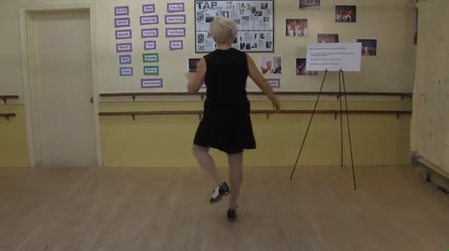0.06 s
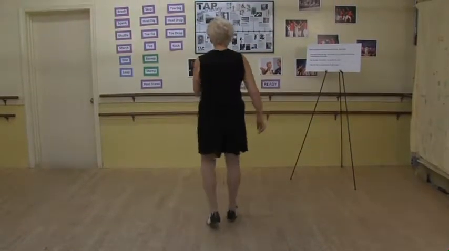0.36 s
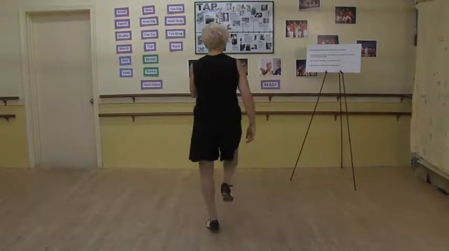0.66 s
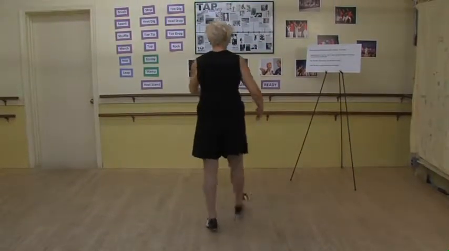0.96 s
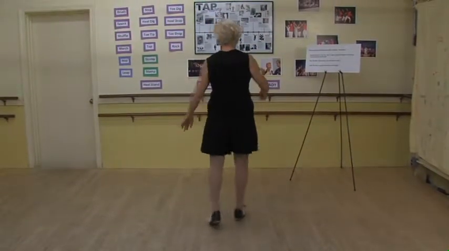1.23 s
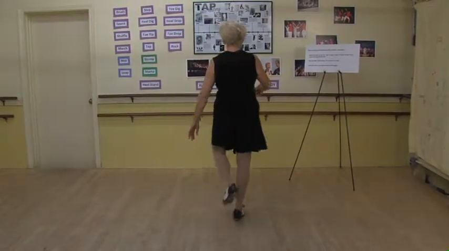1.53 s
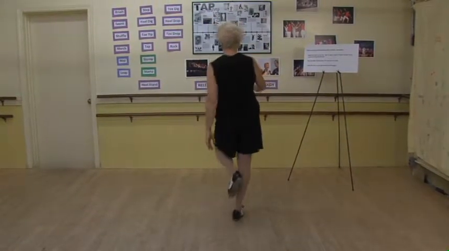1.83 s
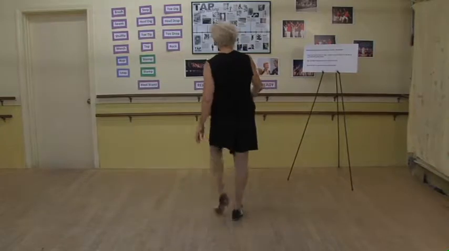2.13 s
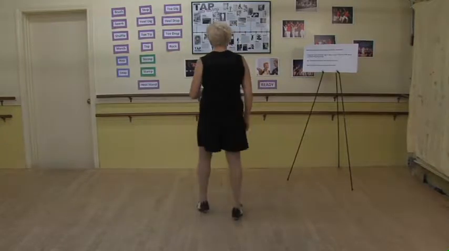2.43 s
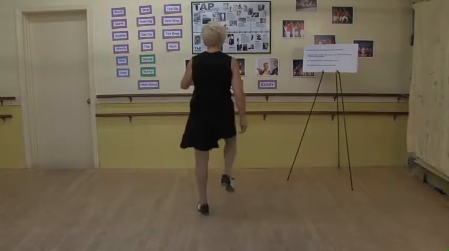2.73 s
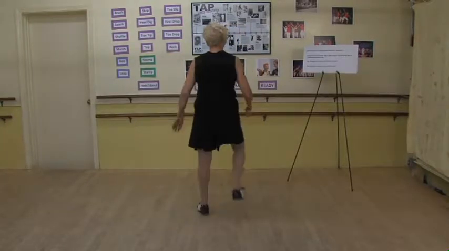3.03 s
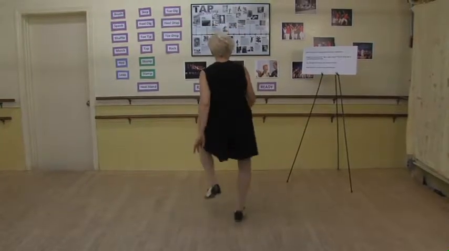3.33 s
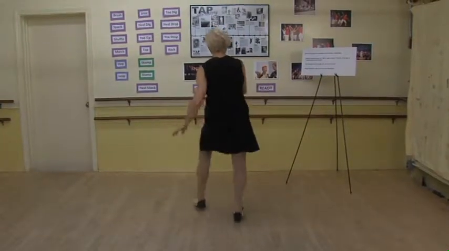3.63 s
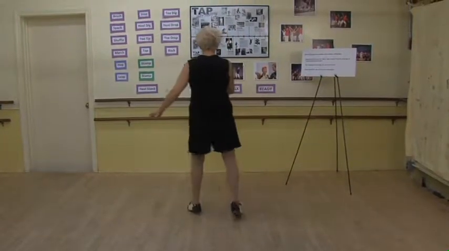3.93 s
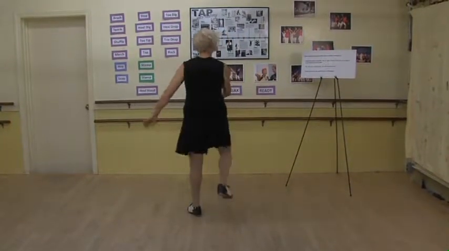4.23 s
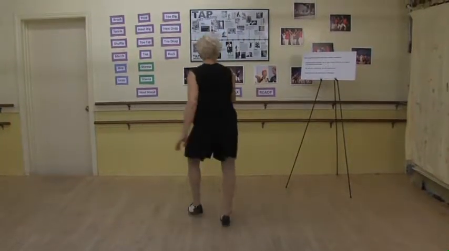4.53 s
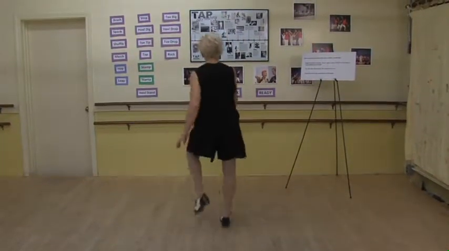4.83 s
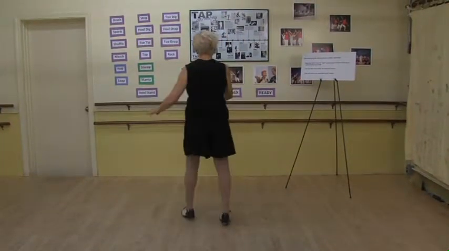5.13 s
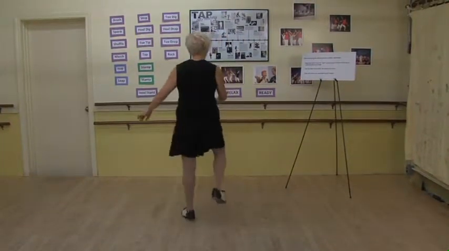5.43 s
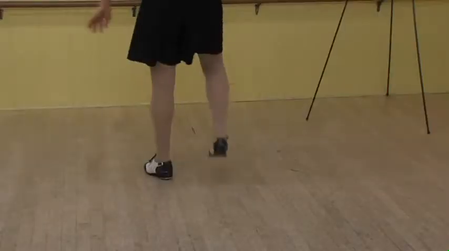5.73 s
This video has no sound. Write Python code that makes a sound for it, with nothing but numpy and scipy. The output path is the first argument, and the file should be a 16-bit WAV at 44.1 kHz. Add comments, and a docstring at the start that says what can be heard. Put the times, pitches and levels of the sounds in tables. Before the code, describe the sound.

A bare dance studio rumbles and hisses quietly as the echo of a brushed tap shoe fades. A dancer in metal-tipped shoes steps slowly on a sprung wooden floor. Each step is a sharp click and slap with a woody knock; the boards boom softly and the walls echo for under a second. Toe taps land at about 0.4 and 0.9 seconds, with a lighter one at 1.1. A pause follows, holding very faint shoe ticks and a tiny sole squeak near 1.8. Steps resume at 2.2 and 2.5, then a barely audible scuff near 3 leads into a heel at 3.2. A firm step at 3.6 is followed by a stamp at 3.9. A heel lands at 4.5, another step at 4.9 and a second stamp at 5.2; the stamps are slightly the loudest. A last flat heel strike comes at 5.8 seconds.

```python
"""A bare, echoing studio rumbles and hisses quietly while the sound of a brushed tap shoe dies away.
A dancer in metal-tipped shoes then steps slowly on the sprung wooden floor. Each step is a click and a
woody knock, then the sharp slap of the plate within a few ms; the boards boom and the walls answer.
Between steps the shifting shoes tick faintly; a sole squeaks near 1.8 s and a plate scuffs near 3 s.
Two stamps come in the second half, and a heel lands last."""
import sys
import numpy as np
from scipy import signal
from scipy.fft import rfft, irfft, next_fast_len
from scipy.io import wavfile

SR = 44100
rng = np.random.default_rng(int(sys.argv[2]) if len(sys.argv) > 2 else 0)


def inscribe(sig):
    """Save sig as 16-bit PCM at rate SR to the path in sys.argv[1].

    A 1-D sig is mono; a 2-D sig holds one channel per row.
    Samples are clipped to [-1, 1] before scaling.
    """
    pcm = np.round(np.clip(np.atleast_2d(sig).T, -1, 1) * 32767)
    wavfile.write(sys.argv[1], SR, pcm.astype(np.int16))


N = 263277
T = np.arange(SR) / SR  # one second of time for each sound
HZ = np.fft.rfftfreq(2 * SR, 1 / SR) + 1e-3  # the frequencies at which filters are drawn


def amp(db):
    """Turn decibels into a gain."""
    return 10 ** (np.asarray(db) / 20)


def norm(x):
    """Scale a sound to an energy of 1."""
    return x / np.sqrt(np.sum(x ** 2) + 1e-20)


def along(points, hz):
    """Read a curve of (frequency, value) points, with octaves evenly spaced."""
    freqs, values = np.transpose(points)
    return np.interp(np.log(hz + 1), np.log(freqs), values)


def above(corner_hz, order):
    """Gain of a filter that cuts the bass; a higher order cuts more steeply."""
    return 1 / np.sqrt(1 + (corner_hz / HZ) ** (2 * order))


def coloured(x, gain):
    """Give each frequency of x its gain, with no ringing ahead of the sound."""
    cepstrum = irfft(np.log(np.maximum(gain, 1e-6)))
    cepstrum[1:SR] *= 2
    cepstrum[SR + 1:] = 0
    return irfft(rfft(x, 2 * SR) * np.exp(rfft(cepstrum)))[:SR]


def add(track, s, x):
    """Mix x into the track at s seconds, dropping what falls outside it."""
    start = int(round(s * SR))
    x, start = x[max(-start, 0):], max(start, 0)
    part = track[start:start + len(x)]
    part += x[:len(part)]


def air():
    """The quiet room rumbles and hisses steadily."""
    # tone of the room: f/Hz, level/dB
    room_tone = [(15, -65.5), (25, -32), (59, -16.5), (104, -10.5), (140, -11), (274, -8.5), (349, -17.5),
                 (399, -17), (1410, -22.5), (4750, -38), (15500, -39.5)]
    gain = amp(along(room_tone, np.fft.rfftfreq(N, 1 / SR)))
    noise = irfft(rfft(rng.standard_normal(N)) * gain, N)
    return amp(-69.5) * np.sqrt(N) * norm(noise)


def contact(chatter, t60):
    """One hit, then the surfaces chatter briefly, fading by 60 dB in t60 seconds."""
    push = chatter * norm(rng.standard_normal(SR) * amp(-60 * T / t60))
    push[0] += 1
    return norm(push)


def knock(hz, t60, rise_s):
    """The plank under the shoe swings quickly to and fro, over the slower flex of the floor."""
    swing = 2 * np.pi * hz * rng.normal(1, 0.026) * T
    plank = (np.sin(swing) + 0.28 * np.sin(0.47 * swing)) * amp(-60 * T / t60)
    flex = 0.14 * np.sin(.19 * swing) * amp(-60 * T / 0.07)
    return norm((plank + flex) * (1 - np.exp(-T / rise_s)))


def boards():
    """The sprung floor booms; every spot rings with its own mix of the same low notes."""
    # notes of the floor: f/Hz, level/dB, fade time/s
    notes = [(72.3, -13.5, 0.98), (133.4, -3.5, 0.74), (159, -4, 0.68), (191.6, -2.5, 0.91),
             (244.4, -1.5, 0.98), (310.6, -4, 1), (404.6, -3.5, 0.82), (489, -4, 0.77)]
    ring = np.zeros(SR)
    for hz, db, t60 in notes:
        fade = amp(db + rng.normal(0, 2.9) - 60 * T / t60)
        ring += fade * np.sin(2 * np.pi * (hz * rng.normal(1, .008) * T + rng.random()))
    return norm(ring * (1 - np.exp(-T / 0.017)))


def reverb(build_s):
    """Echoes blur into a wash that builds up, then each frequency dies at its own speed."""
    # how long the studio rings: f/Hz, fade time/s
    ring_times = [(60, 0.87), (150, 0.52), (350, 1), (1000, 0.81), (2500, 0.81), (4200, 0.76), (7500, 0.62),
                  (11000, 0.5), (16000, 0.39)]
    hz, t, noise = signal.stft(rng.standard_normal(SR), SR, nperseg=256)
    fall_db = -60 * t / along(ring_times, hz)[:, None]
    # a little sound stays trapped between the bare walls and dies more slowly
    decay = np.hypot(amp(fall_db), amp(-21 + 0.89 * fall_db))
    tail = signal.istft(noise * decay, SR, nperseg=256)[1][:SR]
    return norm(tail * (1 - np.exp(-T / build_s)))


def walls(count=14):
    """Separate early echoes bounce off the walls; later ones tend to be weaker."""
    echoes = np.zeros(SR)
    for delay, size in zip(rng.uniform(.016, .085, count), rng.standard_normal(count)):
        add(echoes, delay, np.array([size * amp(-110 * delay)]))
    return norm(echoes)


def step(landing, roll, tilt_db, knock_hz, knock_db):
    """A shoe lands: the metal plate clicks and slaps, the room echoes, the wood knocks and booms."""
    # tone colour of each way of landing: f/Hz, level/dB
    toe = [(140, 1.5), (290, -6.5), (1150, -0.5), (1770, -5.5), (1900, -2), (2730, -8), (3650, -3),
           (4880, -17), (5640, -14), (7540, -18), (10070, -30), (10830, -30), (13450, -35.5), (15000, -49)]
    tip = [(140, 2), (310, -2.5), (420, -18), (690, -7.5), (1420, -11.5), (2360, -3.5), (2940, -21),
           (3160, -12), (4220, -7.5), (5240, -19), (7010, -23), (8710, -17.5), (10070, -27), (15000, -39)]
    edge = [(140, -9.5), (190, -5.5), (360, -9.5), (550, -5), (690, -8.5), (800, -2.5), (2940, -9),
            (4220, -1), (6520, -17.5), (7540, -18.5), (9370, -20.5), (12510, -32), (13450, -29),
            (15000, -48)]
    heel = [(140, 3), (360, -6.5), (690, -5.5), (1420, -1), (1900, -11), (2200, -7.5), (2730, -14.5),
            (3930, -3), (6520, -22.5), (7540, -19.5), (9370, -22), (12510, -37), (14470, -36.5),
            (15000, -48.5)]
    ball = [(140, -6.5), (450, 0), (690, -6.5), (860, -6), (1320, -7.5), (2040, -7.5), (3400, -14),
            (4880, -24), (7010, -28), (10070, -44.5), (10830, -39.5), (12510, -49.5), (13450, -47),
            (15000, -58.5)]
    stamp = [(140, -1.5), (330, 0), (450, 1), (1150, -1), (1530, -5.5), (1900, -5.5), (2360, -1.7),
             (3930, -5), (5640, -5.5), (7540, -16), (9370, -14.5), (12510, -25), (13450, -25.5),
             (15000, -33)]
    brush = [(140, -6.5), (700, 0.5), (2400, -7), (3800, -12.5), (5800, 0.5), (7500, -19), (15000, -24)]
    # each way of landing: tone colour, bass from the dancer's weight/dB, boom/dB, slap delay/s
    spectrum, weight_db, boom_db, slap_s = {
        "toe": (toe, 1.5, -24.5, .0029),
        "tip": (tip, 5, -25, .00055),
        "edge": (edge, 5.8, -25, .0043),
        "heel": (heel, -1.3, -24, .0028),
        "ball": (ball, 6.7, -22.5, .0035),
        "stamp": (stamp, 2.9, -25, .0044),
        "brush": (brush, -.5, -21.5, .0026),
    }[landing]
    # A flat shoe (roll 0) lands in one slap; one that rolls down (roll 1) clicks first,
    # slaps less and throws more sound at the ceiling.
    click_db = np.interp(roll, (0, 1), (-15.5, -3.5))
    slap_db = np.interp(roll, (0, 1), (-1.6, -5.5))
    ceiling_db = np.interp(roll, (0, 1), (-18, 0))
    near = amp(click_db) * contact(chatter=2.5, t60=0.015)
    add(near, slap_s, amp(slap_db) * contact(chatter=1, t60=.0065))
    add(near, .0135, amp(ceiling_db) * contact(chatter=4.3, t60=0.036))
    near += amp(-17.5) * walls()
    # bass and top treble spread sideways, so they arrive mostly with the room
    beam = above(440, order=1) / np.sqrt(1 + (HZ / 7000) ** 2)
    blow = coloured(near, beam) + reverb(build_s=.0035)
    bright_db = tilt_db * np.log2(np.clip(HZ, 300, None) / 1500)
    bass_db = weight_db / (1 + (HZ / 210) ** 4)
    colour = amp(along(spectrum, HZ) + bright_db + bass_db)
    colour *= above(130, order=5) + amp(-19) * above(46, order=1)
    colour /= np.sqrt(np.mean(colour ** 2))
    boom = amp(boom_db) * np.interp(200, HZ, colour) * boards()
    wood = amp(knock_db) * knock(knock_hz, t60=0.031, rise_s=0.00095)
    return norm(coloured(blow, colour) + wood + boom)


def steps():
    """The slow dance; a level is the step's energy spread over a tenth of a second."""
    # footfalls: t/s, landing, level/dB, roll 0-1, brightness/(dB per octave), knock f/Hz, knock level/dB
    footfalls = [ (-.16, "brush", -38.5, 0.4, .5, 900, -12.5), (.42, "toe", -27.5, 0.3, 0.6, 1080, -20.5),
                 (.9, "toe", -26.5, 0.83, 0, 1130, -9.5), (1.1333, "tip", -30.5, 0.6, 1.8, 261, -15),
                 (2.2001, "ball", -25.5, 0.57, 1.62, 1000, -4.5), (2.457, "edge", -28, .55, 0, 820, -16),
                 (3.188, "heel", -29.5, 0.33, 0.87, 1226, -5.5), (3.642, "ball", -25, 0.35, 1.5, 830, -6),
                 (3.8545, "stamp", -24, 0.89, .7, 650, -12), (4.4962, "heel", -27, 0.37, -0.02, 1052, -5),
                 (4.9333, "ball", -27.5, .75, 0.93, 826, -14), (5.1552, "stamp", -24, 0.94, 0.62, 760, -20),
                 (5.802, "heel", -26.6, 0, 0.44, 1230, -3.5), ]
    out = np.zeros(N)
    for s, landing, db, *how in footfalls:
        add(out, s, amp(db) * np.sqrt(SR / 10) * step(landing, *how))
    return out


def touches(skip_s=0.04, skip_loss_db=1.2, width_octaves=0.84):
    """Shoes tick and bump as the weight shifts; in a scuff the plate skips, weaker each time."""
    # light touches of a shoe: t/s, level/dB, f/Hz
    ticks = [(0.307, -69.5, 220), (.325, -69, 450), (1.731, -75, 400), (1.975, -77, 600),
             (2.804, -77.5, 10410), (2.937, -77.5, 5940), (4.403, -70, 3010)]
    scuff_s, scuff_db, scuff_hz = 3.056, -68, 3040
    skips = [(scuff_s + k * skip_s, scuff_db - k * skip_loss_db, scuff_hz) for k in range(3)]
    out = np.zeros(N)
    for s, db, hz in ticks + skips:
        band = np.exp(-(np.log2(HZ / hz) / width_octaves) ** 2 / 2) + amp(-49)
        rub = norm(rng.standard_normal(SR) * T * amp(-60 * T / .04))
        touch = coloured(rub + 1.1 * reverb(build_s=.012), band)
        add(out, s, amp(db) * np.sqrt(SR / 10) * norm(touch))
    return out


def squeak(start_s=1.8095, level_db=-57, hz=1400, length_s=.0075):
    """A twisting sole sticks and slips, giving one tiny chirp."""
    swell = np.sin(np.pi * np.minimum(T / length_s, 1)) ** 2
    chirp = swell * np.sin(2 * np.pi * hz * T)
    echo = signal.fftconvolve(chirp, reverb(build_s=0.0058))[:SR]
    out = np.zeros(N)
    add(out, start_s, amp(level_db) * (chirp + 0.31 * echo))
    return out


def scene():
    """The dancer in the studio, in one channel."""
    return (steps() + touches() + squeak() + air())[None]


def record(dry):
    """Cut away the very highest treble."""
    size = next_fast_len(N + SR)
    kept = np.fft.rfftfreq(size, 1 / SR) < 15800  # Hz
    return irfft(rfft(dry, size) * kept, size)[:, :N]


dry = scene()
out = record(dry)
inscribe(out)
```